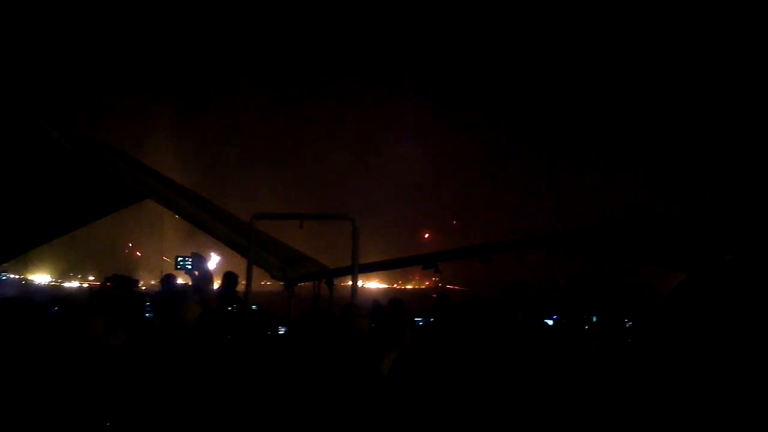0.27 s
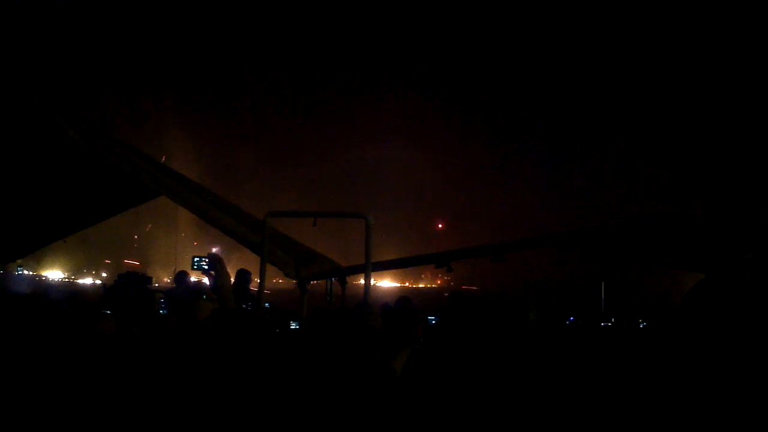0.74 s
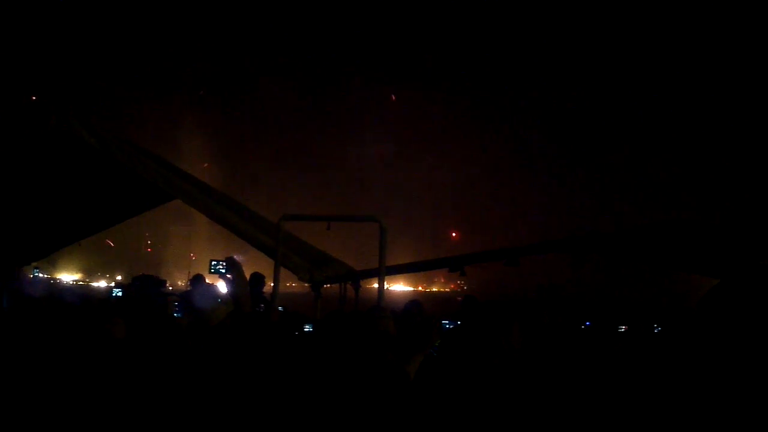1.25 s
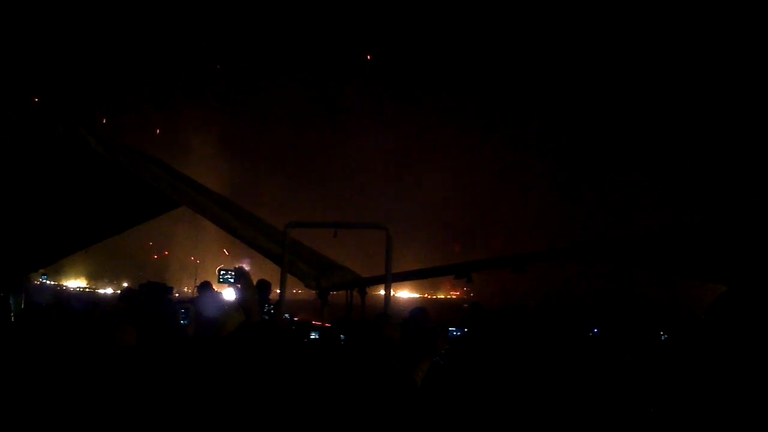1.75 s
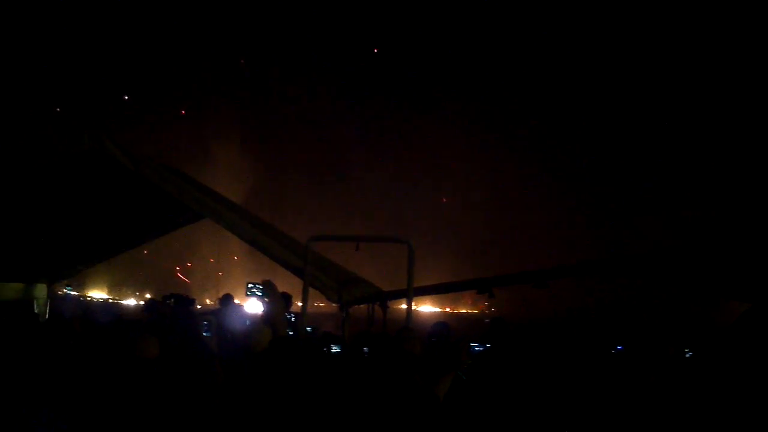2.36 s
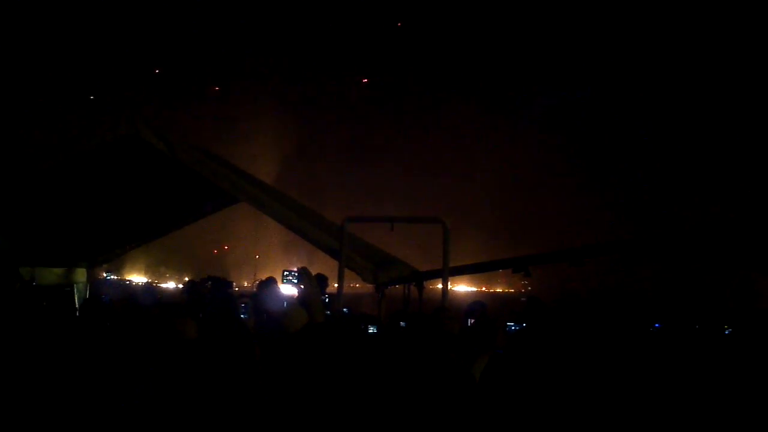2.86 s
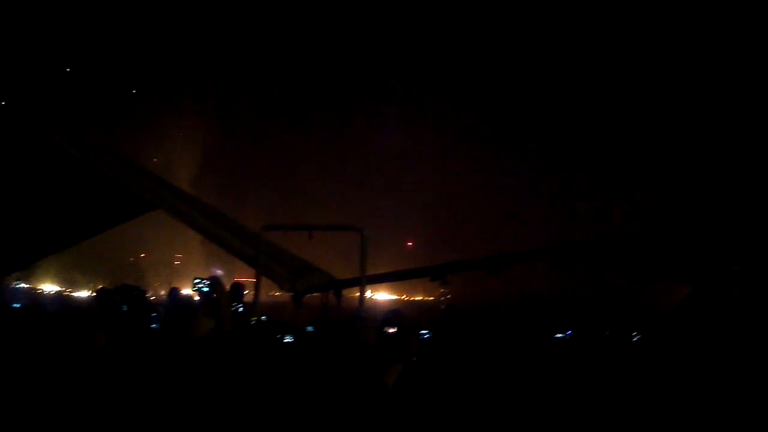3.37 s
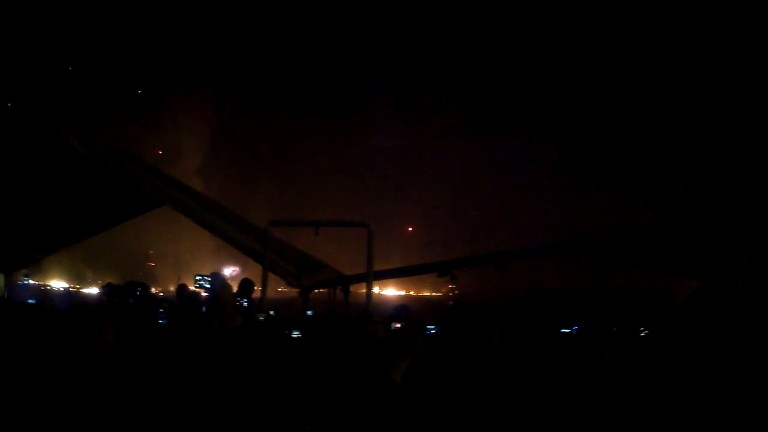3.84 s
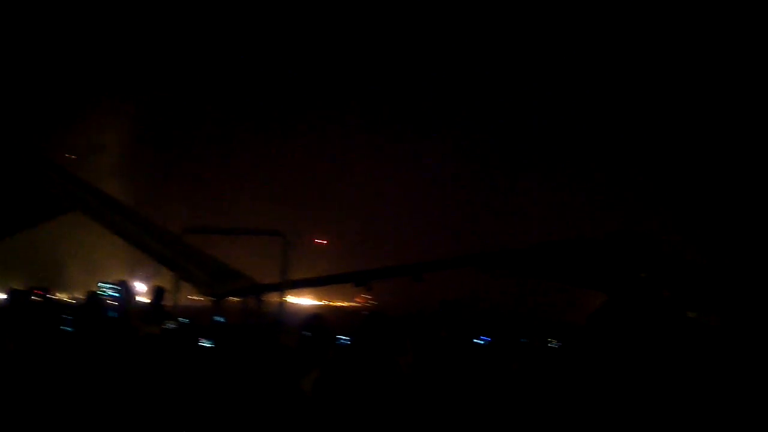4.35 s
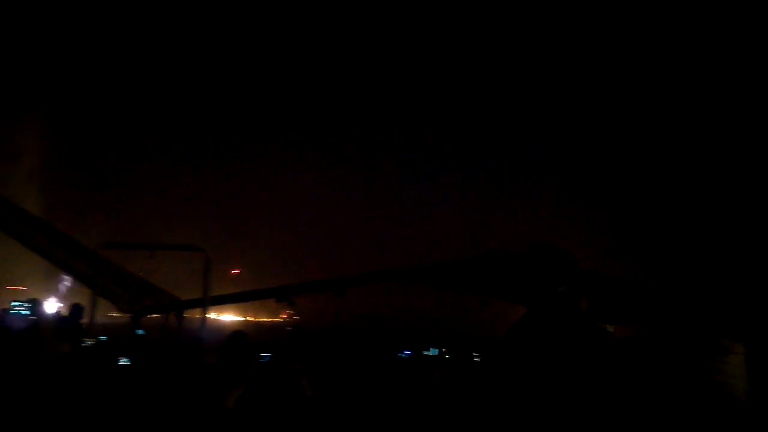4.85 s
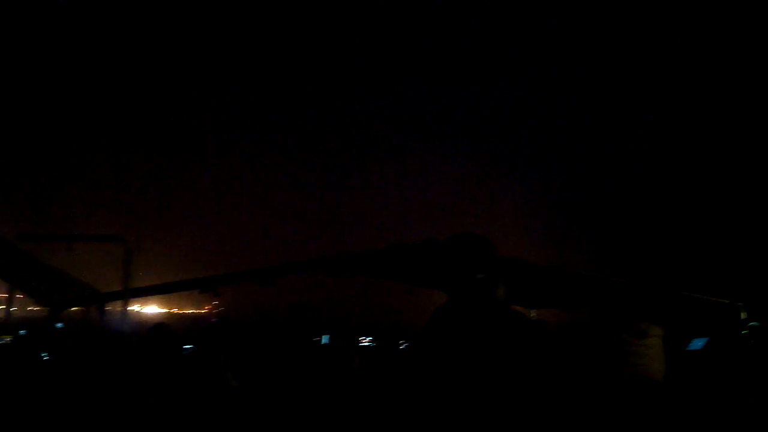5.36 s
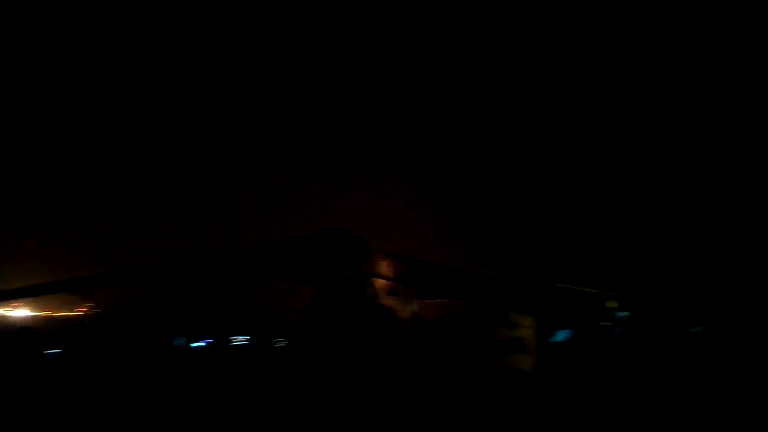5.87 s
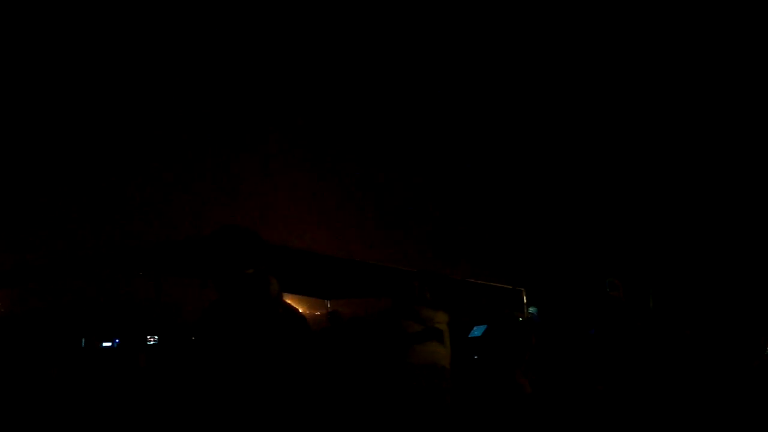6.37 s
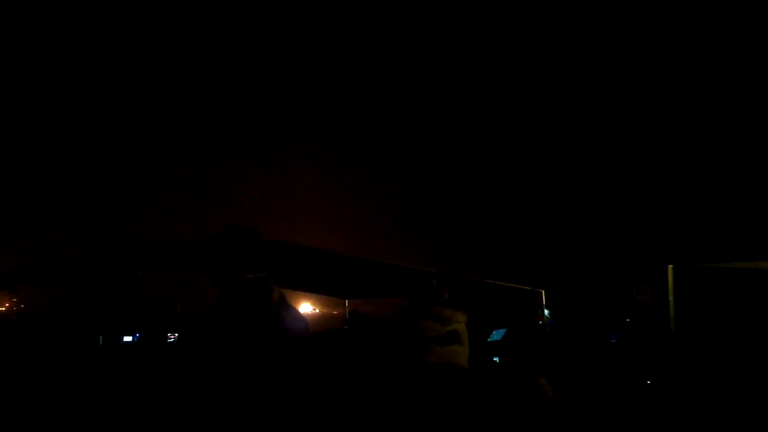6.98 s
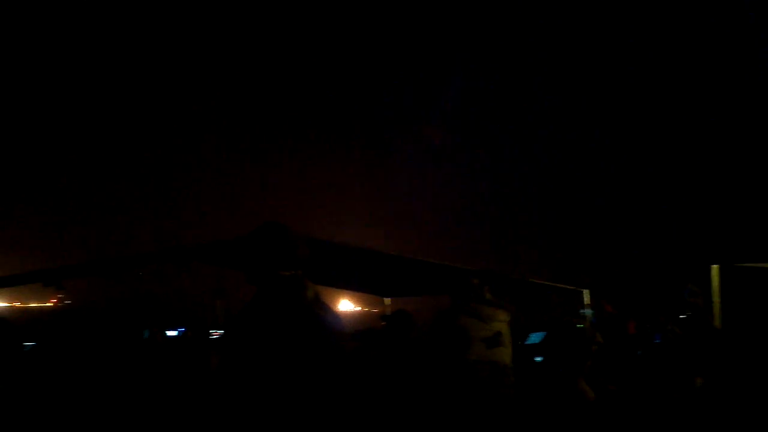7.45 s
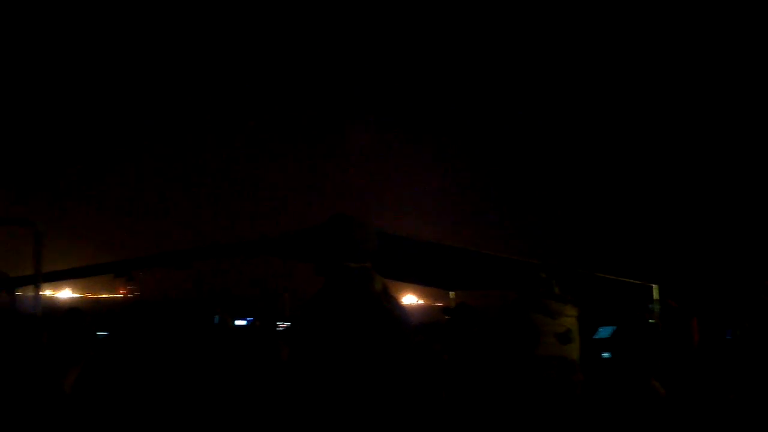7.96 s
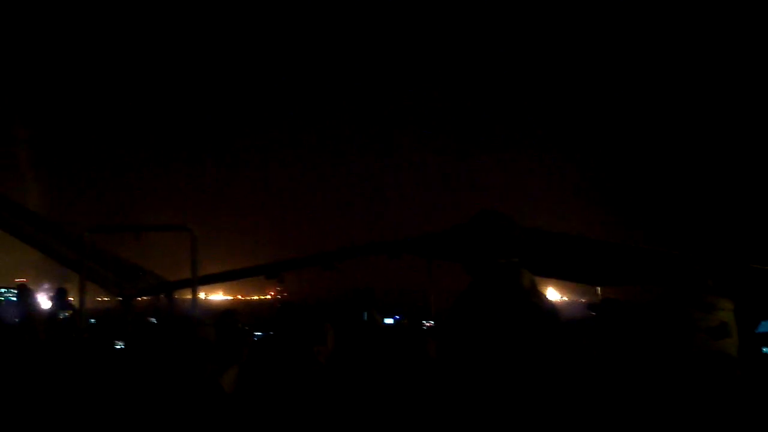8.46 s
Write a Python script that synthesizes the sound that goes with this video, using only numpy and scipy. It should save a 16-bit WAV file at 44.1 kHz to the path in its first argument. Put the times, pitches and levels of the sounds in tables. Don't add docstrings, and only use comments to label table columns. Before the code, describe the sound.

Dense automatic gunfire under a roofed firing line: steady hard thumps, sharp cracking light bursts, ringing steel, occasional deep booms, distant rumbling fire behind.

```python
import sys
import numpy as np
from scipy import signal
from scipy.fft import rfft, irfft, next_fast_len
from scipy.io import wavfile
from scipy.ndimage import uniform_filter1d

SR = 44100
rng = np.random.default_rng(int(sys.argv[2]) if len(sys.argv) > 2 else 0)


def volts_from_decibels(level):
    exponent = np.asarray(level, float) / 20
    return 10 ** exponent


def output_pcm(signal):
    pcm = np.clip(np.atleast_2d(signal).T, -1, 1) * 32767
    wavfile.write(sys.argv[1], SR, np.round(pcm).astype(np.int16))


N = 384552

# time in seconds, body level in dB, treble level in dB.
FAR_ROAR = [(0, -26.5, -32), (.14, -25.5, -35.5), (.6, -30.5, -45), (.99, -27.5, -36), (1.5, -29, -45),
            (1.9, -27.5, -36), (2.84, -29, -40.5), (3.4, -30, -39), (4.2, -31, -43.5), (5.2, -31.5, -42.5),
            (6.63, -29.5, -39.5), (6.75, -26.5, -33.5), (7.31, -29, -39.5), (7.55, -32.5, -43.5),
            (7.99, -29, -37.5), (8.4, -32, -43.5), (8.6, -35, -46), (8.72, -24, -35)]
# centre in Hz, heavy level in dB, light level in dB,
# snap over tail in dB, t60 in seconds, far roar level in dB.
SCATTER_BANDS = [(107, -60, -12, 6, .35, 3.5), (200, -60, -31, 7, 0.23, 5.5),
                 (344, -60, -17, 5.5, 0.22, 3.5), (531, -10, -12.5, 6.5, 0.13, -1),
                 (887, -9.5, -26, -14, 0.26, -4), (1296, -19, -16, 6, 0.1, -6),
                 (2074, -14.5, -19.5, 6.5, 0.23, -3.5), (2650, -10, -42, 2.5, 0.18, -7),
                 (3830, -18.5, -19.5, 10.5, .28, -4), (5210, -14, -46, -15, 0.25, -9.5),
                 (8100, -1.5, -10.5, 5.5, 0.24, 2.5), (10500, -24.5, -17.5, 5.5, 0.028, -53),
                 (15000, -9.5, -20, -10, 0.16, -30)]
# frequency in Hz, likeness from 0 to 1, right minus left in dB.
PORT_SHADE = [(100, .985, -3.3), (200, .97, -1.8), (380, .87, -1.6), (620, .64, -2.5), (950, .35, 0),
              (2000, .45, 1), (2700, .4, -2), (3600, .05, -7), (5200, .05, -5), (6600, .05, -7),
              (8200, .05, -7), (9700, .05, -3), (11500, .1, -4.5)]
# start in seconds, level in dB, pitch in Hz, knock level in dB.
BOOMS = [
    (0.849, 6, 128, -1.5),
    (5.244, 7, 113, -4.5),
    (6.959, 4, 123, -2),
    (7.71, -0.5, 200, -32),
    (7.818, -0.5, 200, -30),
    (7.937, 2, 200, -31),
]
# first round in seconds, last round in seconds, bark in dB, crack in dB, ring in Hz.
QUICK_BURSTS = [(.2504, .349, -12, -21, 1200), (.9027, 1.182, -16.5, -14.5, 1310),
                (1.4786, 1.6756, -13, -16.5, 1070), (1.5524, 1.644, -13.5, -16, 1070),
                (2.172, 2.3655, -16.5, -20, 1090), (2.3812, 2.5674, -17, -17, 1430),
                (3.204, 3.3018, -20, -11.5, 1290), (4.0339, 4.226, -14.5, -16, 1080),
                (4.5449, 4.9205, -13.5, -17, 1370), (5.261, 5.3607, -12, -18.5, 1170),
                (5.4678, 5.6535, -13, -18, 1170), (6.064, 6.267, -9.5, -17.5, 1200),
                (6.872, 7.0604, -10, -16.5, 1140), (6.94, 7.0382, -34.5, -19, 1100),
                (7.478, 7.6796, -10.5, -19, 1270), (8.0638, 8.4648, -12, -27, 1185)]
# first round in seconds, last round in seconds, bark in dB, crack in dB,
# ring in Hz.
SLOW_BURSTS = [(.075, .2992, -16.5, -12.5, 1800), (.445, .681, -7, -10, 1090),
               (1.0367, 1.1522, -11.5, -12.5, 1450), (1.2667, 1.4976, -11, -9.5, 1440),
               (1.7261, 1.838, -10, -9.5, 1340), (1.9559, 2.074, -10.5, -9, 1380),
               (2.4107, 2.6319, -11, -10.5, 1270), (5.9932, 6.1003, -10.5, -10.5, 1000)]
# start in seconds, bark in dB, crack in dB, ring in Hz.
LONE_ROUNDS = [(.0014, -15, -13.5, 1910), (0.1052, -8, -6.5, 900), (0.0985, -15, -15, 1510),
               (.2195, -13, -25, 1100), (0.271, -14, -18, 1170), (0.3329, -10.5, -9.5, 1300),
               (0.359, -15, -27, 1190), (.6114, -9, -15, 710), (0.698, -15.5, -30, 1150),
               (0.714, -16, -16, 780), (.7783, -8.5, -18, 690), (0.801, -8.5, -9.5, 1440),
               (1.3665, -17, -15, 1490), (1.6113, -24, -10.5, 890), (1.8283, -24, -37, 1420),
               (3.0579, -15, -38, 710), (4.8406, -11, -43, 710), (5.1176, -22, -20, 1980),
               (5.501, -19, -31, 1350), (6.3594, -7.5, -17.5, 1150), (6.5612, -11, -21, 2190),
               (6.7648, -13.5, -19, 1140), (6.823, -30, -16, 1200), (7.1524, -26, -18, 1700),
               (8.6451, -8.5, -9, 820), (8.707, -30, -24, 1300)]
# first round in seconds, last round in seconds, thump in dB, bark in dB.
HEAVY_RUNS = [(.0119, .3144, -2.7, -11), (.4141, .722, -1.5, -12.5), (.8226, 1.0207, -1.5, -13.5),
              (1.1172, 1.3088, -0.9, -15), (1.4081, 1.6035, -2, -13), (1.6984, 1.987, -0.5, -16.5),
              (2.0863, 2.1854, -1.5, -14.5), (2.289, 2.4837, -5.5, -12.5), (2.5776, 2.5776, -2.5, -12.5),
              (2.6794, 2.8759, 0.7, -13), (2.9781, 3.1761, -0.5, -14.5), (3.268, 3.268, -1.5, -13.5),
              (3.3727, 3.6675, -0.5, -13.5), (3.7721, 3.967, -0.2, -16), (4.0673, 4.3607, -1, -13),
              (4.463, 4.561, 0.8, -14.5), (4.6585, 4.8643, -1.5, -14.5), (4.961, 4.961, -3, -12),
              (5.0693, 5.3693, -1.5, -13), (5.473, 5.5731, -1, -14.5), (5.6773, 5.7745, -2, -15),
              (5.8796, 5.978, -2, -14), (6.0825, 6.1788, -1, -13), (6.2816, 6.487, -1.5, -16),
              (6.5866, 6.9809, 0, -13.5), (7.0763, 7.5601, -0.5, -16.5), (7.6598, 7.758, 0, -18),
              (7.8608, 7.9599, -1.2, -15), (8.0634, 8.1621, -2, -13.5), (8.2646, 8.667, 0, -15)]
# time in seconds, then changes of thump, bark and crack in dB.
ODD_ROUNDS = [(.112, -3, -0.5, -15), (.212, 2, -1, 4.5), (.314, 1, -2, -1.5), (1.309, 2, -3, -0.5),
              (1.506, -2, 0, -4), (2.289, 4, 1.5, 2.5), (3.077, -22, -1.5, 0.5), (6.083, -1.5, -0.5, -2.5),
              (6.981, 0.5, -14, -3), (7.175, 1, -5, 0.5), (7.861, -3, 0, 0.5), (8.063, -15, -1, -1),
              (8.464, -4, 1.8, -0.5)]
# time in seconds, crack level in dB.
PHONE_FACING = [(0, -20), (1.6, -22), (2.2, -20), (3.1, -24), (3.6, -20.5), (4.6, -22), (5.2, -23.5),
                (6.6, -23), (7.6, -25), (8.7, -21.5)]
# pitch in Hz, level in dB, t60 in seconds.
STEEL_RINGS = [(108, -1, 0.12), (131.5, -1, 0.15), (420, -11, 0.054), (262.4, -4, 0.24), (343.6, -8, 0.36),
               (671.7, 3, 0.034), (832, -8.5, 0.091), (1000, -9, 0.043)]
# delay in milliseconds, level in dB, length in milliseconds.
BLAST_PATHS = [
    (0.282, -5.5, 3.55),
    (3.194, -4, 4.78),
    (7.26, -6.5, 5.55),
    (13.8, -13.5, 7.8),
    (22.6, -12, 6.9),
    (34.72, -21.5, 1.61),
    (42.32, -9.5, 3.85),
    (47.2, -61, 2.1),
]

HEAVY_CYCLE_S, QUICK_CYCLE_S, SLOW_CYCLE_S = 0.099, 0.095, 0.115
PORT_LAG, FRONT_LAG, BODY_LAG = 5, 2, 15
PORT_DB = -2.3
CROSS_LAG, CROSS_FEED = 15, 0.99


def train(s, db):
    x = np.zeros(N)
    np.add.at(x, np.minimum((np.asarray(s) * SR).astype(int), N - 1), volts_from_decibels(db))
    return x


def conv(x, h):
    return signal.oaconvolve(x, h)[:N]


def late(x, count):
    return np.concatenate([np.zeros(count), x[:-count]])


def fade(power, t60_s):
    return signal.lfilter([1], [1, -np.exp(-2 * np.log(1000) / (t60_s * SR))], power)


def band(white, hz, octaves):
    size = 2 * (white.shape[1] - 1)
    f = np.arange(1, size // 2 + 2) * SR / size
    bell = np.exp(-(np.log2(f / hz) / octaves) ** 2)
    x = irfft(white * bell, size)[:, :N]
    return x / x[0].std()


def blast(ms, skew):
    u = np.linspace(0, 1, int(ms * SR / 1000))
    return np.sin(2 * np.pi * u ** skew)


def ports(x, lag, shade_hz):
    dull = signal.lfilter(*signal.butter(1, shade_hz, fs=SR), x)
    return np.array([x, volts_from_decibels(PORT_DB) * late(dull, lag)])


def rounds(bursts, cycle_s):
    rows = []
    for first_s, last_s, *rest in bursts:
        count = round((last_s - first_s) / cycle_s) + 1
        rows += [(s, *rest) for s in np.linspace(first_s, last_s, count)]
    return rows


def light_rounds():
    return np.transpose(rounds(QUICK_BURSTS, QUICK_CYCLE_S) + rounds(SLOW_BURSTS, SLOW_CYCLE_S) + LONE_ROUNDS)


def heavy_rounds():
    s, thump_db, bark_db = np.transpose(rounds(HEAVY_RUNS, HEAVY_CYCLE_S))
    db = np.array([thump_db, bark_db, np.interp(s, *np.transpose(PHONE_FACING))])
    for at_s, *change_db in ODD_ROUNDS:
        db[:, np.argmin(abs(s - at_s))] += change_db
    return (s, *db)


def far_patter():
    place, chance = rng.random((700, 2)).T
    shots = train(place * N / SR, -3.1 * np.log(1 - 0.93 * chance))
    power = fade(shots ** 2, 0.2)
    return 0.5 + 0.5 * power / power.mean()


def scatter():
    heavy_s, _, heavy_bark, heavy_crack = heavy_rounds()
    light_s, light_bark, light_crack, _ = light_rounds()
    roar_s, body_db, treble_db = np.transpose(FAR_ROAR)
    delay_ms, path_db, _ = np.transpose(BLAST_PATHS)
    shade_hz, likeness, shade_db = np.transpose(PORT_SHADE)
    patter = far_patter()
    echoes = train(delay_ms / 1000, path_db + 6)[:SR // 10] ** 2
    white = rfft(rng.standard_normal((2, next_fast_len(N // 2) * 2)))
    out = 0
    for hz, heavy_db, light_db, snap_db, t60_s, roar_db in SCATTER_BANDS:
        bright = np.clip(np.log2(hz / 1500) / 1.77, 0, 1)
        big = train(heavy_s + 0.00048, heavy_db + heavy_bark + bright * (heavy_crack - heavy_bark)) ** 2
        small = train(light_s, light_db + light_bark + bright * (light_crack - light_bark)) ** 2
        shots = big + small
        snap = volts_from_decibels(snap_db) ** 2 * fade(shots + 0.068 * np.abs(conv(shots - small, echoes) +
                                                               conv(small, echoes)), 0.033)
        level_db = np.interp(np.arange(N) / SR, roar_s, body_db + bright * (treble_db - body_db))
        roar = volts_from_decibels(roar_db + level_db) ** 2 * patter
        power = uniform_filter1d(snap + fade(shots, t60_s), size=45) + roar
        one, other = band(white, hz, 0.47) * np.sqrt(power)
        alike = np.interp(np.log(hz), np.log(shade_hz), likeness)
        right_db = np.interp(np.log(hz), np.log(shade_hz), shade_db)
        shared = late(one, PORT_LAG if hz < 1200 else BODY_LAG)
        right = alike * shared + np.sqrt(1 - alike ** 2) * other
        out = out + np.array([one, volts_from_decibels(right_db) * right])
    return out


def booms():
    t = np.arange(SR // 8) / SR
    swell = (1 - np.exp(-t / 0.0025)) * np.exp(-t / 0.009)
    sinking = t + 0.0032 * (1 - np.exp(-t / 0.00093))
    out = 0
    for s, db, hz, knock_db in BOOMS:
        out = out + conv(train([s], db), swell * np.sin(2 * np.pi * hz * sinking))
        out = out + conv(train([s], knock_db), blast(3.1, 0.57))
    return out


def light_barks():
    out, t = np.zeros(N + 800), np.arange(800) / SR
    swell = (1 - np.exp(-t / 0.0006)) * np.exp(-t / 0.002)
    for s, bark_db, _, hz in light_rounds().T:
        out[int(s * SR):][:800] -= volts_from_decibels(bark_db + 4) * np.sin(2 * np.pi * hz * t) * swell
    s, bark_db = light_rounds()[:2]
    return out[:N] + conv(train(s, bark_db), blast(2.27, 0.5))


def cracks():
    heavy_s, _, _, heavy_db = heavy_rounds()
    light_s, _, light_db, _ = light_rounds()
    fronts = train(heavy_s + 0.0006, heavy_db + 5) + train(light_s + 0.0003, light_db + 3)
    return conv(fronts, blast(0.21, 0.34))


def heavy_rings():
    s, _, bark_db = heavy_rounds()[:3]
    t, vary = np.arange(SR // 8) / SR, rng.standard_normal((len(s), len(STEEL_RINGS)))
    out = 0
    for k, (hz, ring_db, t60_s) in enumerate(STEEL_RINGS):
        strikes = train(s + 0.001, bark_db + ring_db + 1.6 * vary[:, k])
        out = out + conv(strikes, np.sin(2 * np.pi * hz * t) * 0.00065 ** (t / t60_s))
    return out


def heavy_thumps():
    s, thump_db = heavy_rounds()[:2]
    vary = rng.standard_normal((len(s), len(BLAST_PATHS), 2))
    strong = 0
    for k, (delay_ms, path_db, length_ms) in enumerate(BLAST_PATHS):
        arrival_s = s + (delay_ms + 0.14 * vary[:, k, 0]) / 1000
        arrivals = train(arrival_s, thump_db + path_db + 1.55 * vary[:, k, 1])
        strong = strong + conv(arrivals, blast(length_ms, 0.88))
    place, size = rng.random((60, 2)).T
    late_s = 0.01055 + 0.17 * place
    thicket = train(late_s, -21 - 60 * late_s / 0.44 - 7 * size)[:SR // 5]
    return strong + conv(conv(train(s, thump_db), thicket), blast(7.2, 0.69))


def scene():
    left = heavy_thumps() + heavy_rings() + booms() + cracks()
    return ports(left, PORT_LAG, 2700) + ports(light_barks(), FRONT_LAG, 7600) + volts_from_decibels(-2.0) * scatter()


def roll_off(x):
    return signal.sosfilt(signal.butter(12, 16510, fs=SR, output="sos"), x)


def record(dry):
    x = signal.sosfilt(signal.butter(4, 85, "high", fs=SR, output="sos"), dry)
    x = np.tanh(0.5 * x) / 0.72
    x = x - CROSS_FEED * np.array([late(x[1], CROSS_LAG), late(x[0], CROSS_LAG)])
    x = np.clip(x, -1.4, 1.4)
    x = x - 0.15 * x ** 3
    x = signal.sosfilt(signal.ellip(8, 0.2, 60, 15800, fs=SR, output="sos"), x)
    return roll_off(x)


dry = scene()
out = record(dry)
output_pcm(out)
```